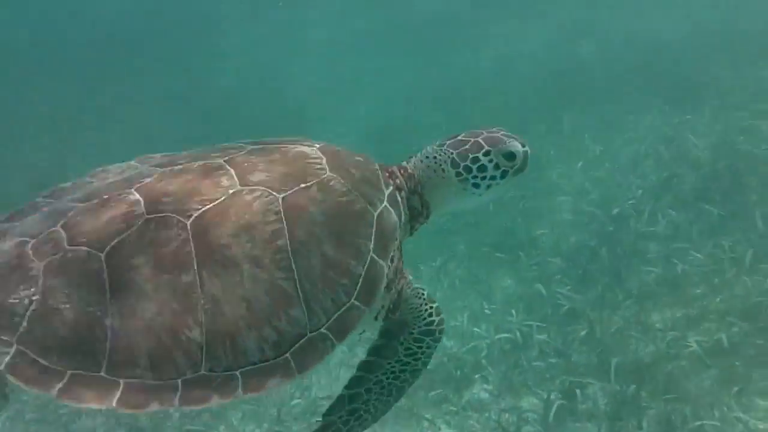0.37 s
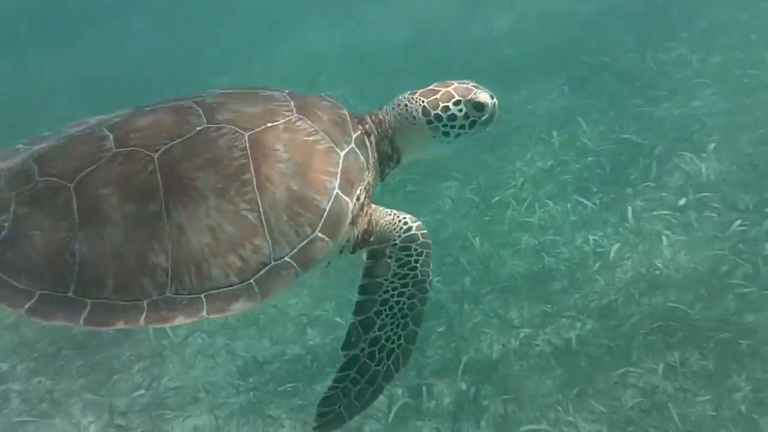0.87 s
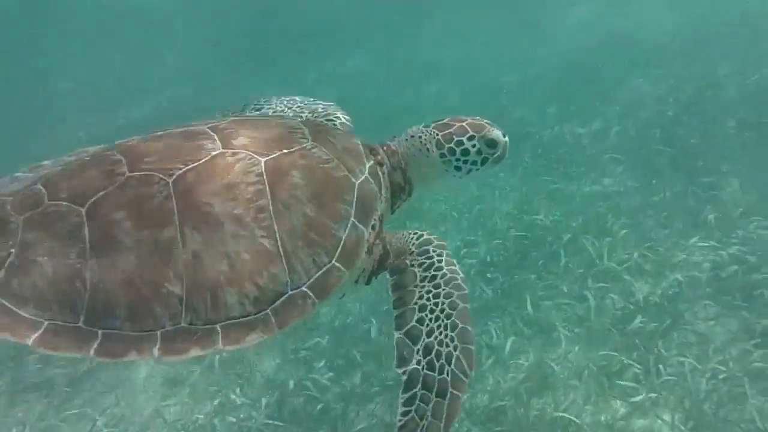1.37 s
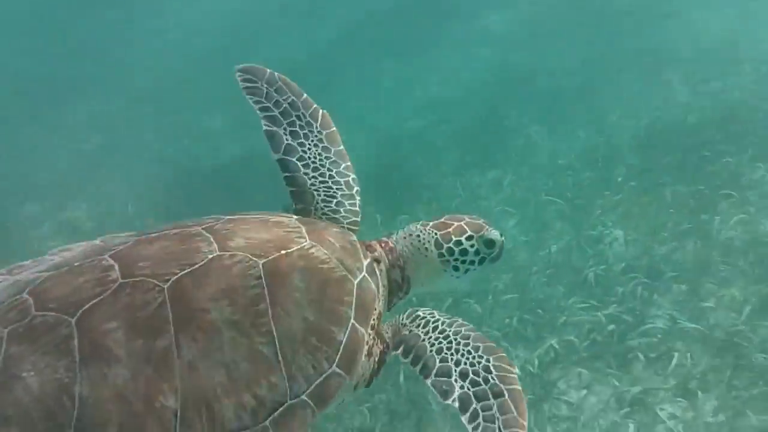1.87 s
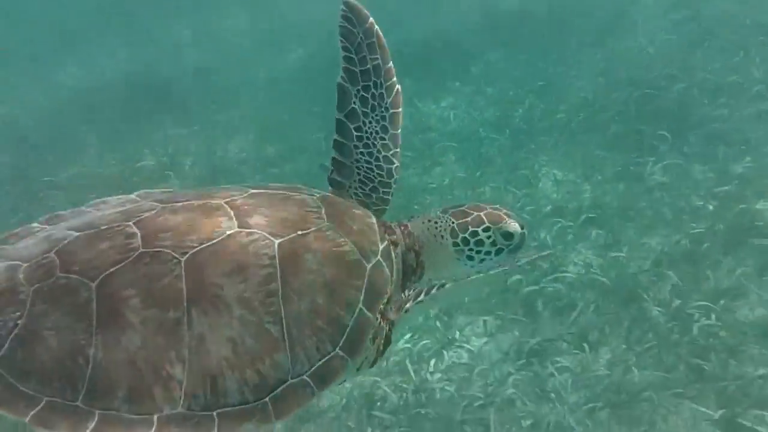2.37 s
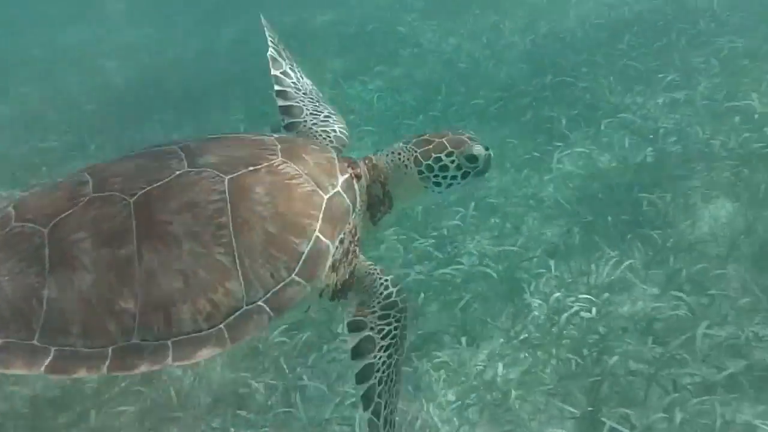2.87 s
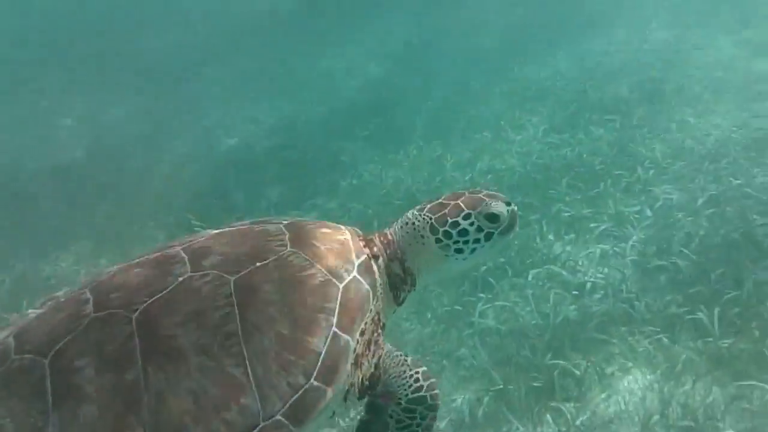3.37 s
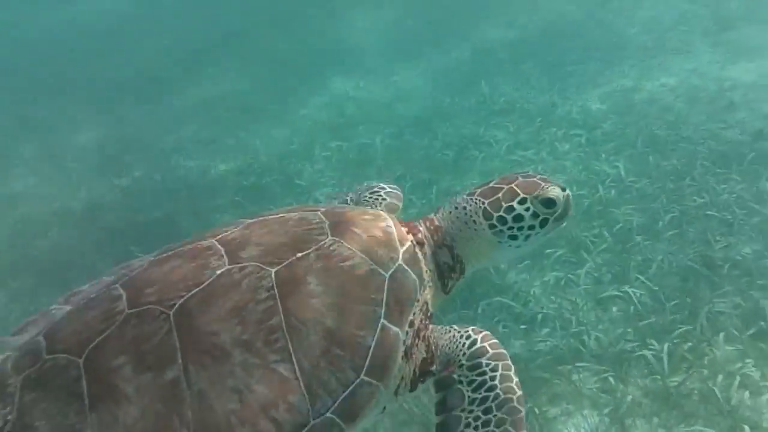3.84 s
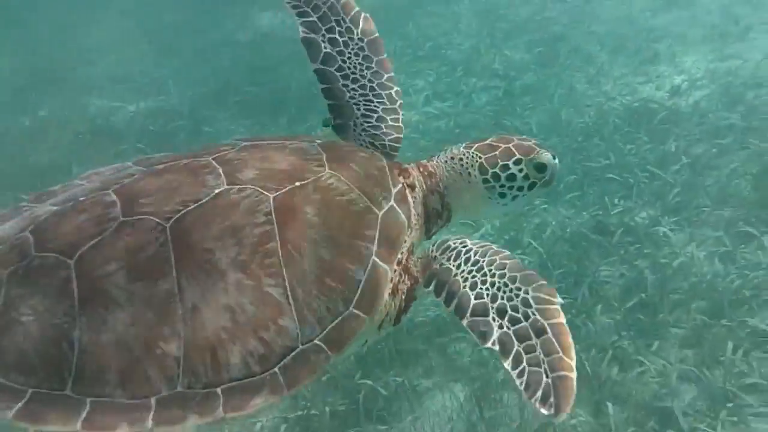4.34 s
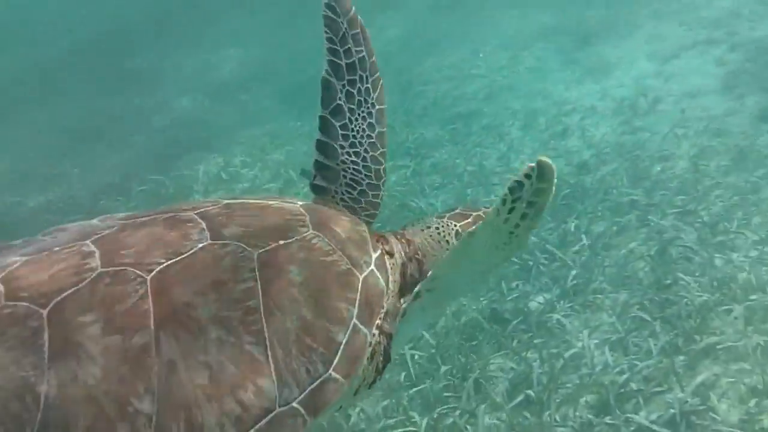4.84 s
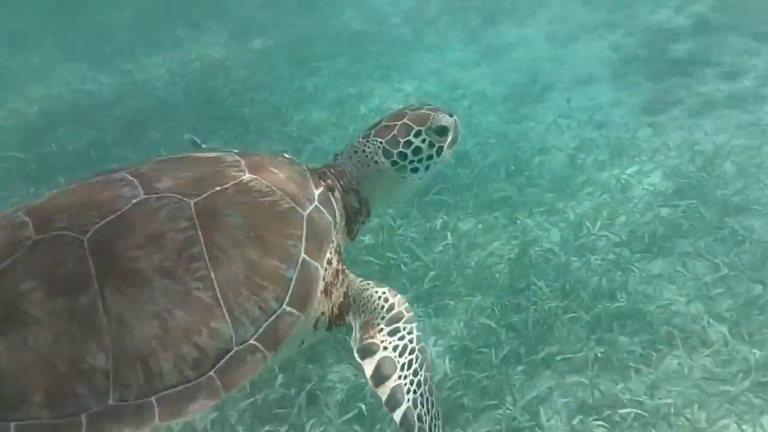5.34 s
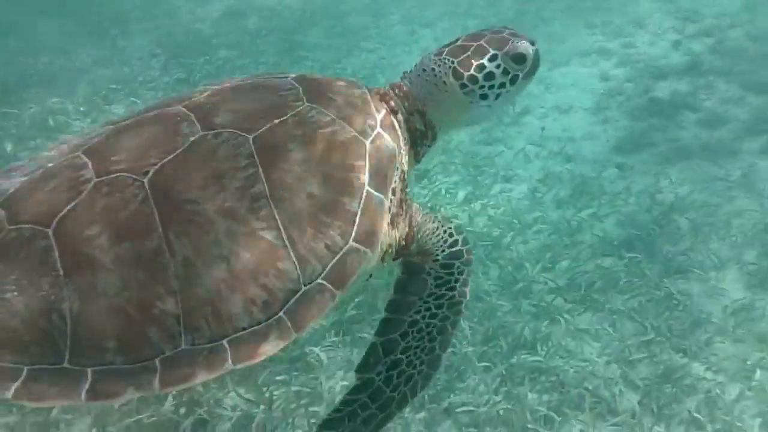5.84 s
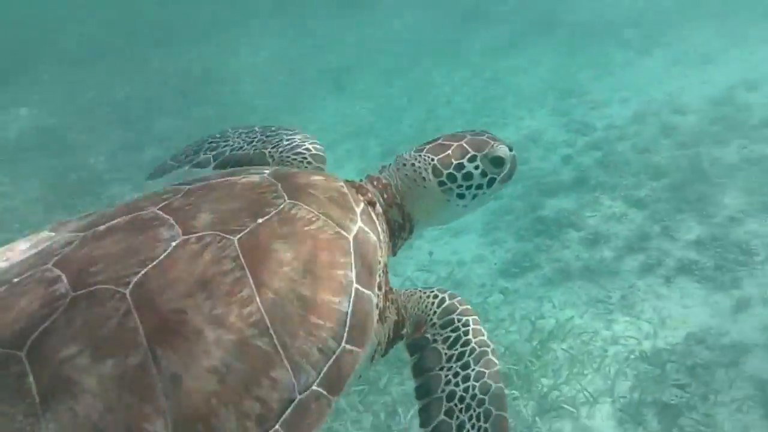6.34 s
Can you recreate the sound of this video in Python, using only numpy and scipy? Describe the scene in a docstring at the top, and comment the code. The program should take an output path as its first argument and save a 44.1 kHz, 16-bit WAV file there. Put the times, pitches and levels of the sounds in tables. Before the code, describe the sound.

Water hums and gulps against a sealed housing underwater, tiny clicks ticking, then a sudden glugging air burst and stronger gurgles afterwards.

```python
"""Water surges past a small sealed camera housing adrift over sea-grass; its air pocket hums and gurgles.
The hum is noise through a resonance; rumble, thuds and rattle are noise shaped in pitch and level.
Gulps and bubbles are short rising tones, shrimp snaps are tones with a noisy front, fizz is many tiny clicks.
Trapped air bursts out once and a thin tone sinks after it; the sealed microphone cuts notches into everything."""
import sys
import numpy as np
from scipy import signal
from scipy.fft import rfft, irfft, next_fast_len
from scipy.io import wavfile

SR = 44100
rng = np.random.default_rng(int(sys.argv[2]) if len(sys.argv) > 2 else 0)


def master_out(mix):
    """Clip the mix to full scale and print it as 16-bit PCM to the path in sys.argv[1]."""
    frames = np.transpose(np.atleast_2d(mix))
    ceiling = np.clip(frames, -1, 1)
    pcm = np.round(ceiling * 32767).astype(np.int16)
    wavfile.write(sys.argv[1], SR, pcm)


def boost(x):
    """Linear amplitude factor 10**(x/20) for a level x in decibels (scalar or array-like)."""
    u = np.asarray(x, float) / 20
    return 10 ** u


N = 284886  # length in samples

# Level curves, joined by straight lines: t/s, level/dB
# near-inaudible rumble around 8 Hz
LOW_RUMBLE_LEVEL = [(0, -39.5), (.12, -28.5), (.9, -35), (1.6, -26.5), (1.93, -39.5), (2.25, -24.5),
                    (2.72, -39), (2.9, -26), (3.7, -32), (3.81, -21.5), (4.0, -39), (4.9, -30), (5.11, -40),
                    (5.52, -27), (5.7, -40), (6.03, -32.5), (6.1, -29.5), (6.46, -44)]
# water pushing past the housing: hum of the air pocket
FLOW_LEVEL = [(0, -65), (.12, -40.5), (.4, -47), (.85, -47.5), (1.05, -52), (1.22, -56.5), (1.25, -43),
              (1.48, -36.5), (1.88, -43), (2.05, -50), (2.16, -49.5), (2.32, -39.5), (2.45, -40),
              (2.56, -47), (2.81, -45), (3.6, -46), (4.16, -58.5), (4.42, -56), (4.65, -40), (5.29, -39.5),
              (5.56, -57.5), (5.67, -33), (6.04, -31), (6.33, -44), (6.46, -39)]
# churned water rushing over the shell: its rattle
RUSH_LEVEL = [(0, -59.5), (.27, -48.5), (.5, -53), (1.0, -54.5), (1.25, -58.5), (1.45, -52), (2.0, -59.5),
              (2.32, -54), (2.75, -50), (3.1, -53), (3.62, -45.5), (4.3, -54), (4.75, -46.5), (5.25, -51),
              (5.42, -56.5), (5.85, -48.5), (6.3, -49), (6.46, -42.5)]
# thudding slosh
THUD_LEVEL = [(0, -59), (.26, -51), (.5, -57), (.95, -52.5), (1.1, -66.5), (1.22, -58), (1.4, -46.5),
              (1.6, -60), (1.8, -49), (2.1, -62), (2.56, -48.5), (3.05, -54), (3.5, -57), (3.64, -46.5),
              (4.16, -57.5), (4.42, -67), (4.65, -49), (5.29, -48.5), (5.5, -69), (5.67, -43), (5.9, -41),
              (6.2, -50.5), (6.46, -50)]
# fizz near 2 kHz
FIZZ_LEVEL = [(0, -73.5), (.17, -59.5), (.3, -59), (.6, -60), (.75, -68), (1.2, -65.5), (1.4, -61.5),
              (1.7, -61), (1.97, -66), (2.76, -59.5), (3.6, -56.5), (4.1, -63), (4.5, -66), (4.75, -60.5),
              (5.38, -67.5), (5.63, -63), (6.17, -62), (6.46, -61.5)]

# Wandering pitches
# pitch favoured by the slosh inside the housing: t/s, f/Hz
SLOSH_PITCH = [(0, 340), (.25, 342), (.8, 228.7), (1.18, 301.5), (1.45, 166.1), (1.9, 170), (2.05, 271),
               (2.5, 214), (3.05, 245), (3.6, 177.6), (3.95, 170), (4.68, 295), (4.8, 149.7), (5.15, 297.6),
               (5.65, 158.5), (5.95, 118.9), (6.25, 190), (6.46, 201.5)]
# thin tone sinking after the burst: t/s, f/Hz, level/dB
AFTERTONE_PATH = [(4.0, 570, -77), (4.12, 567, -65.5), (4.3, 550, -45), (4.42, 540, -58), (4.5, 526, -72)]

# Tone colours, only relative within each table: f/Hz, level/dB
# near-inaudible rumble, strongest around 8 Hz
LOW_RUMBLE_COLOUR = [(3, -42), (5, 0), (8, 11.5), (12, -3), (18, -2.5), (30, -13), (60, -35), (120, -42)]
# deep tones of the wash
DEEP_COLOUR = [(15, -16), (30, -1), (55, 3), (100, -7), (140, -22), (220, -32)]
# thuds on the wall
THUD_COLOUR = [(80, -27.5), (130, -5), (170, -2), (300, -3.5), (380, -8.5), (700, -49.5)]
# rattle of the shell
RATTLE_COLOUR = [(500, -9), (700, -2.5), (900, -1.5), (1060, -5.5), (1150, -19), (1300, -46.5),
                 (2000, -21.5)]
# lower band of the fizz
FIZZ_LOW_COLOUR = [(900, -15.5), (1300, 0.5), (1700, -2.5), (2100, 8.5), (2400, 7), (3000, -11),
                   (4000, -40)]
# upper band of the fizz
FIZZ_HIGH_COLOUR = [(2200, -41.5), (3000, -2.5), (3850, 1), (4400, -6), (4900, -2.5), (5200, -22),
                    (7000, -21.5)]
# fine spray in the burst
SPRAY_COLOUR = [(5000, 6.5), (6500, 8), (9000, 14), (11000, 8), (15500, -6.5)]

# Resonances and notches
# narrow shell modes that sing along with the hum: f/Hz, width f/Hz, level against the hum/dB
SHELL_RESONANCES = [(1392, 68, -41.5), (1676, 37, -35.5), (2115, 69, -34)]
# notches of the sealed microphone: f/Hz, width f/Hz
MICROPHONE_NOTCHES = [(632, 86), (2705, 820), (5500, 610), (7850, 2200), (10955, 800)]

# Single events; f is the pitch at the start, decay is the time to fall 60 dB
# nearest shrimp snaps: t/s, peak level/dB, f/Hz, drive of the noisy front against the peak/dB
NEAR_SNAPS = [(.2947, -47.5, 3480, -3), (.308, -45, 3730, -3), (.377, -43.5, 3730, -3),
              (.7505, -35, 3880, -22), (1.4426, -47, 3273, 3), (1.616, -46, 3810, 5),
              (1.8364, -46, 3850, -8), (1.8883, -48, 3720, -3), (2.1186, -46, 3540, 11.5),
              (2.2825, -40, 3770, -17), (2.5735, -52, 3236, 6), (2.6707, -40.5, 3056, -4),
              (2.9755, -53, 3920, 10), (3.035, -44.5, 3094, -9), (3.0864, -49, 3686, -8),
              (3.2176, -48, 3150, 3), (3.3228, -47.5, 3903, -3), (3.7065, -50, 3230, 4),
              (3.7274, -50, 3600, -11), (3.799, -42.5, 3206, 6), (3.9901, -37.5, 3700, -5),
              (4.3033, -46, 3972, 10), (4.3876, -47.5, 3170, 6), (4.696, -45.5, 3160, 1),
              (5.3228, -54, 3500, 4), (5.3734, -52, 3800, 6), (5.3945, -51.5, 3596, -1),
              (5.4201, -41, 3075, -9), (5.5522, -44, 3313, -20), (5.7433, -50, 4193, -2)]
# brightest thin ticks, drive of three noise bands: t/s, 8-10.9 kHz level/dB, 5.6-7.7 kHz level/dB,
# 11-15.6 kHz level/dB
BRIGHT_TICKS = [(.2977, -49, -62, -54), (.3087, -44, -62, -48), (.3755, -55, -47, -66),
                (.815, -53, -64, -52), (.9016, -46, -70, -49), (.9962, -50, -47, -61),
                (1.4426, -56, -59, -53), (1.8392, -48, -68, -68), (1.9516, -54, -69, -63),
                (2.3545, -48, -68, -54), (2.5748, -48, -50, -68), (2.7093, -51, -70, -51),
                (2.823, -50, -65, -65), (2.9754, -56, -43, -62), (3.1423, -57, -68, -52),
                (3.9898, -52, -69, -44.5), (4.3023, -42.5, -48, -58), (4.3869, -51, -54, -67),
                (4.4199, -54, -70, -60), (4.5516, -49, -61, -63), (4.571, -50, -52, -49.5),
                (4.8015, -50, -67, -70), (5.7423, -54, -56, -57), (5.7786, -46.5, -51, -70),
                (6.3345, -56, -46, -65)]
# clearest small bubbles: t/s, peak level/dB, f/Hz
SMALL_BUBBLES = [(0.045, -44.5, 1030), (.046, -36.5, 677), (.066, -35.5, 1064), (.109, -42, 750),
                 (.1935, -43, 2030), (.3007, -40, 2000), (.3646, -43, 2250), (.389, -41.5, 940),
                 (.772, -42, 898), (.826, -41, 714), (.9872, -45.5, 2137), (1.0191, -44.5, 2040),
                 (1.6494, -44, 1010), (2.597, -38, 767), (2.638, -38, 705), (2.741, -46, 914),
                 (2.812, -36, 798.5), (3.0126, -46, 2030), (3.2176, -50, 1508), (3.417, -34.5, 803),
                 (3.457, -34, 806), (3.5329, -47, 1860), (3.565, -44, 840), (3.5967, -43, 2030),
                 (3.822, -27, 860), (3.855, -23, 1000), (3.961, -36.5, 850), (4.2283, -46, 2350),
                 (4.4348, -42, 2300), (4.455, -36, 678), (4.5381, -42.5, 2140), (4.778, -41.5, 2178),
                 (4.627, -46, 957), (4.7, -33.5, 725), (5.002, -54, 860), (5.826, -39.5, 697),
                 (6.101, -38, 711), (6.19, -35.5, 742), (6.231, -41, 788), (6.32, -34, 720),
                 (6.405, -34.5, 720)]
# large slow bubbles leaving the housing: t/s, peak level/dB, f/Hz, decay t/s
LARGE_BUBBLES = [(.22, -41, 75, .1), (2.392, -42, 101, .12), (2.516, -38, 235, 0.11), (2.7, -41.5, 227, .2),
                 (2.89, -33.5, 238, 0.14), (3.561, -24.5, 178.6, 0.049), (3.645, -31.5, 146, 0.046),
                 (3.762, -11.5, 148, 0.036), (3.836, -15, 80.7, 0.024), (3.94, -29.5, 74.3, 0.049),
                 (4.085, -34.5, 80, 0.047), (4.401, -32.5, 261.7, 0.029), (4.69, -34.5, 285, 0.088),
                 (4.736, -27, 152, 0.081), (5.19, -36, 259, 0.097), (5.481, -34, 216, 0.14),
                 (6.378, -43.5, 234, 0.23)]
# loudest gulps of the air pocket: t/s, peak level/dB, f/Hz, decay t/s
POCKET_GULPS = [(1.272, -33.5, 425, 0.13), (1.32, -29.5, 420, 0.17), (1.609, -29, 416, 0.086),
                (1.761, -31, 406, 0.09), (1.828, -29.5, 406, 0.15), (2.08, -35, 458, 0.17),
                (2.47, -30.5, 434, 0.055), (2.811, -33.5, 419.3, 0.11), (3.415, -38, 421, 0.17),
                (3.763, -11.5, 428, 0.025), (3.777, -12, 410, 0.027), (3.795, -18, 385, 0.033),
                (3.819, -16, 361, .036), (3.844, -8.5, 407, .022), (3.858, -9.5, 435, .041),
                (3.907, -19, 386, 0.051), (3.927, -21.5, 411, 0.041), (3.947, -19, 398, 0.11),
                (3.974, -18, 393, 0.05), (4.048, -25.5, 431, 0.16), (4.08, -28, 418, 0.073),
                (4.129, -26.5, 431, 0.12), (4.162, -40, 427, 0.082), (4.407, -31.5, 404, 0.11),
                (4.757, -27.5, 445, 0.015), (4.916, -32, 465, 0.072), (5.624, -28, 417, 0.072),
                (5.676, -24, 428.3, 0.3), (5.809, -29, 409, 0.11), (5.864, -15.5, 421.5, 0.083),
                (5.918, -19, 409, 0.044), (5.951, -22, 403, .053), (5.989, -23.5, 403, 0.13),
                (6.019, -20, 419.6, 0.11), (6.19, -27, 475, 0.05)]


def rms_one(x):
    """Scale a signal to rms 1."""
    return x / np.sqrt(np.mean(x ** 2) + 1e-20)


def in_time(rows):
    """Turn each column after the times into a curve with one value per sample."""
    s, *columns = np.transpose(rows)
    return [np.interp(np.arange(N) / SR, s, column) for column in columns]


def gain_curve(rows):
    """Turn a level table into a gain for every sample."""
    return boost(in_time(rows)[0])


def colour(x, spectrum):
    """Filter by a tone colour, cut hard beyond its ends; rms 1."""
    size = next_fast_len(N)
    hz, level_db = np.transpose(spectrum)
    bins_hz = np.arange(size // 2 + 1) * SR / size
    curve_db = np.interp(np.log(bins_hz + 1e-3), np.log(hz), level_db, -90, -90)
    return rms_one(irfft(rfft(x, size) * boost(curve_db), size)[:N])


def drift(rate_hz):
    """A slow random wander of rms 1: noise smoothed twice, computed every 40 samples."""
    step = 40
    r = np.exp(-2 * np.pi * step * rate_hz / SR)
    noise = rng.standard_normal(N // step + 2002)
    slow = signal.lfilter([1], [1, -2 * r, r * r], noise)[2000:]  # skip the filter's start
    return np.interp(np.arange(N) / step, np.arange(len(slow)), rms_one(slow))


def lumpy(lump_db, rate_hz):
    """Turbulent noise whose strength wavers at random."""
    return rng.standard_normal(N) * boost(lump_db * drift(rate_hz))


def grains(per_s, spread_db):
    """Random clicks of either sign, mostly small, a few large."""
    size_db = spread_db * np.minimum(rng.exponential(1, N), 5)
    sizes = boost(size_db) * rng.choice([-1, 1], N)
    return sizes * (rng.random(N) < per_s / SR)


def resonance(x, hz, width_hz):
    """A resonance applied twice, for dark flanks; rms 1."""
    r, w = np.exp(-np.pi * width_hz / SR), 2 * np.pi * hz / SR
    stage = [0.99, 0.034, -1.03, 1, -2 * r * np.cos(w), r * r]
    return rms_one(signal.sosfilt([stage] * 2, x + 1e-18))


def wandering(x, hz, width_hz):
    """A moving resonance: narrow low-passed noise carried on a wandering pitch; rms 1."""
    lowpass = signal.butter(2, width_hz / 2, fs=SR, output="sos")
    first, second = signal.sosfilt(lowpass, [x, np.roll(x, N // 2)])
    phase = 2 * np.pi * np.cumsum(hz) / SR
    return rms_one(first * np.cos(phase) + second * np.sin(phase))


def swarm(per_s, spread_db, low_hz, high_hz, cycles):
    """Random clicks dealt to 14 pitches on a log scale, each ringing as a bubble; rms 1."""
    clicks, dealt = grains(per_s, spread_db), rng.integers(0, 14, N)
    total = 0
    for k, hz in enumerate(np.geomspace(low_hz, high_hz, 14)):
        # more cycles mean a narrower, longer ring; higher pitches are weaker
        total = total + resonance(clicks * (dealt == k), hz, hz / cycles) / np.sqrt(hz)
    return rms_one(total)


def rings(rows, rise_cycles, glide):
    """Each row swells quickly, then dies away, its pitch creeping upward as a bubble's does."""
    out = np.zeros(N + SR)
    phases = rng.uniform(0, 2 * np.pi, len(rows))
    for (s, peak_db, hz, t60), phase in zip(rows, phases):
        t60 = np.clip(t60, .003, .5)
        t = np.arange(int(t60 * SR)) / SR
        shape = (1 - np.exp(-t * hz / rise_cycles)) ** 2 * boost(-60 * t / t60)
        tone = np.sin(2 * np.pi * hz * t * (1 + glide * t / t60) + phase)
        at = int(s * SR)
        out[at:at + len(t)] += boost(peak_db) * shape / shape.max() * tone
    return out[:N]


def follow(base_db, per_flow, per_rush):
    """Gain driven by flow and rush together, in dB per dB away from their reference levels."""
    flow_db = in_time(FLOW_LEVEL)[0] + 44  # reference -44 dB
    rush_db = in_time(RUSH_LEVEL)[0] + 53  # reference -53 dB
    return boost(base_db + per_flow * flow_db + per_rush * rush_db)


def low_rumble():
    """Very low noise of uneven level under the water."""
    return gain_curve(LOW_RUMBLE_LEVEL) * colour(rng.standard_normal(N), LOW_RUMBLE_COLOUR)


def pocket_hum():
    """Turbulence excites the air pocket and, far more weakly, the narrow modes of the shell."""
    turbulence = rng.standard_normal(N)
    hum = resonance(turbulence, hz=428, width_hz=78)
    for hz, width_hz, level_db in SHELL_RESONANCES:
        hum += boost(level_db) * resonance(turbulence, hz, width_hz)
    return (gain_curve(FLOW_LEVEL) + burst(peak_db=-28, hold_s=0.19, release_db_per_s=67)) * hum


def surge():
    """Turbulence hums in the air pocket, sounds deep, thuds on the wall and rattles the shell."""
    hum = pocket_hum()
    wash = lumpy(lump_db=2.5, rate_hz=12)
    gurgle = swarm(per_s=300, spread_db=3, low_hz=520, high_hz=1200, cycles=12)
    churn = rms_one(lumpy(lump_db=1.5, rate_hz=14))
    rattle = colour(churn + boost(-12.5) * gurgle, RATTLE_COLOUR)
    slosh = wandering(wash, in_time(SLOSH_PITCH)[0], width_hz=58)
    thud = colour(wash, THUD_COLOUR) + boost(-2) * slosh
    deep = colour(wash, DEEP_COLOUR)
    gouts = ragged()
    deep_gain = follow(base_db=-54, per_flow=-.1, per_rush=0.24)
    deep_gain += gouts * burst(peak_db=-33, hold_s=0.072, release_db_per_s=72)
    thud_gain = gain_curve(THUD_LEVEL) + gouts * burst(peak_db=-32.5, hold_s=0.13, release_db_per_s=77)
    rattle_gain = gain_curve(RUSH_LEVEL) + gouts * burst(peak_db=-36, hold_s=0.078, release_db_per_s=76)
    return hum + deep_gain * deep + thud_gain * thud + rattle_gain * rattle


def fizz():
    """Far clicks and tiny bubbles merge into a grainy hiss in two bands; the burst adds fine spray."""
    far = rms_one(grains(per_s=1500, spread_db=3.5)) + .7 * lumpy(lump_db=2.5, rate_hz=11)
    far += boost(-7) * swarm(per_s=400, spread_db=3.5, low_hz=1482, high_hz=5325, cycles=15)
    low_gain = gain_curve(FIZZ_LEVEL) + burst(peak_db=-53, hold_s=0.09, release_db_per_s=190)
    fade = boost(-0.62 * np.arange(N) / SR)  # the upper band loses 0.62 dB per s
    high_gain = follow(base_db=-68.5, per_flow=.05, per_rush=.15) * fade
    high_gain += burst(peak_db=-60, hold_s=0.055, release_db_per_s=81)
    spray = colour(lumpy(lump_db=3.0, rate_hz=40), SPRAY_COLOUR)
    spray *= burst(peak_db=-68.5, hold_s=0.1, release_db_per_s=99)
    return low_gain * colour(far, FIZZ_LOW_COLOUR) + high_gain * colour(far, FIZZ_HIGH_COLOUR) + spray


def far_snaps(count):
    """Rows like those of the near snaps, at random moments."""
    when, size, pitch, front = rng.random((count, 4)).T
    s = when * (N - 1) / SR
    peak_db = -55 + 0.5 * np.log(1 - .95 * size)  # from -55 dB down to about -56.5 dB
    hz = 3030 + pitch * (4300 - 3030)
    return np.transpose([s, peak_db, hz, -7.0 + 8.0 * front])


def cracks(s, drive_db, edges_hz, far):
    """A millisecond or so of band noise at each time, among many faint far clicks."""
    clicks = far * boost(4.0 * rng.standard_normal(N))  # far clicks differ from band to band
    clicks[(s * SR).astype(int)] += boost(drive_db)
    puff = np.exp(-np.arange(300) / SR / .0014)
    band = signal.butter(3, edges_hz, "band", fs=SR, output="sos")
    return signal.sosfilt(band, np.convolve(clicks, puff)[:N] * rng.standard_normal(N))


def shrimp():
    """Snaps ring in the housing behind a noisy front; ticks are all treble; a far crackle has every band."""
    s, peak_db, hz, front_db = np.vstack([NEAR_SNAPS, far_snaps(count=26)]).T
    far = np.abs(grains(per_s=55, spread_db=1.5))
    far *= boost(-0.36 * np.arange(N) / SR)  # slowly left behind, 0.36 dB per s
    decay_s = 48 / hz  # 48 cycles of the starting pitch
    snaps = rings(np.transpose([s, peak_db, hz, decay_s]), rise_cycles=0.47, glide=0.031)
    snaps += cracks(s, peak_db + front_db, (1800, 5300), boost(-62) * far)
    s, mid_db, lower_db, upper_db = np.transpose(BRIGHT_TICKS)
    ticks = cracks(s, mid_db, (8000, 10900), boost(-65) * far)
    ticks += cracks(s, lower_db, (5600, 7700), boost(-68) * far)
    ticks += cracks(s, upper_db, (11000, 15600), boost(-73) * far)
    return snaps + ticks


def small_bubbles():
    """Small bubbles pop: each rings for 48 cycles of its starting pitch."""
    rows = [(s, peak_db, hz, 48 / hz) for s, peak_db, hz in SMALL_BUBBLES]
    return rings(rows, rise_cycles=0.6, glide=0.02)


def gulps_and_glugs():
    """Large bubbles leave slowly and the air pocket gulps, each a short ring with a rising pitch."""
    glugs = rings(LARGE_BUBBLES, rise_cycles=1.0, glide=0.024)
    return glugs + rings(POCKET_GULPS, rise_cycles=0.91, glide=0.067)


def burst(peak_db, hold_s, release_db_per_s):
    """Gain of the one burst of trapped air: quick attack, hold, release."""
    start_s, attack_s = 3.762, 0.0087
    t = np.arange(N) / SR - start_s
    falling_s = np.maximum(t - attack_s - hold_s, 0)
    return np.clip(t / attack_s, 0, 1) * boost(peak_db - release_db_per_s * falling_s)


def ragged():
    """A wavering gain that makes the burst come in uneven gouts."""
    return boost(3.0 * drift(rate_hz=30))


def aftertone():
    """Noise in a very narrow band sounds as a wavering tone."""
    hz, level_db = in_time(AFTERTONE_PATH)
    return boost(level_db) * wandering(rng.standard_normal(N), hz, width_hz=29)


def scene():
    """All the water sounds add up at one microphone."""
    water = low_rumble() + surge() + fizz()
    creatures_and_bubbles = shrimp() + small_bubbles() + gulps_and_glugs()
    return (water + creatures_and_bubbles + aftertone())[None]


def band_limit(x):
    """A steep low-pass at the top of the band."""
    return signal.sosfilt(signal.butter(12, 15690, fs=SR, output="sos"), x)


def record(dry):
    """The microphone adds hiss; its sealed mounting cuts notches, then the top treble is cut."""
    mix = dry + boost(-73.5) * rng.standard_normal(dry.shape)
    for hz, width_hz in MICROPHONE_NOTCHES:
        mix = signal.lfilter(*signal.iirnotch(hz, hz / width_hz, SR), mix)
    lowpass = signal.ellip(8, .5, 40, 15300, fs=SR, output="sos")  # cutoff 15300 Hz
    mix = signal.sosfilt(lowpass, mix)
    return band_limit(mix)


dry = scene()
out = record(dry)
master_out(out)
```